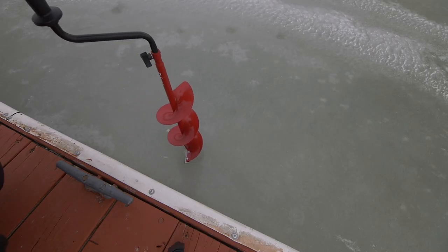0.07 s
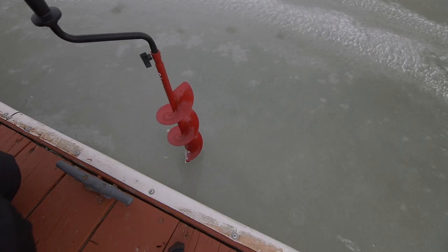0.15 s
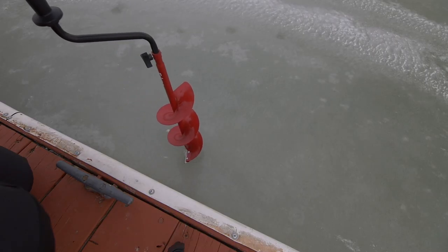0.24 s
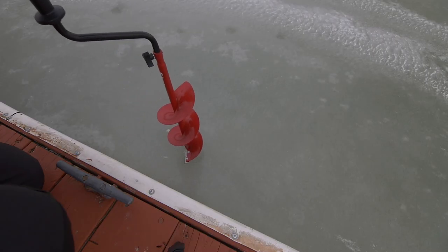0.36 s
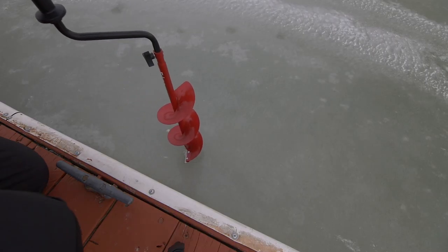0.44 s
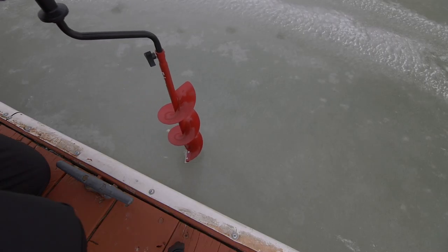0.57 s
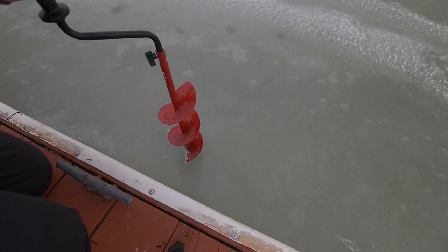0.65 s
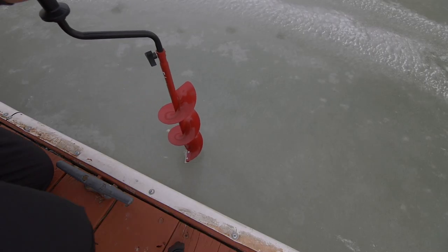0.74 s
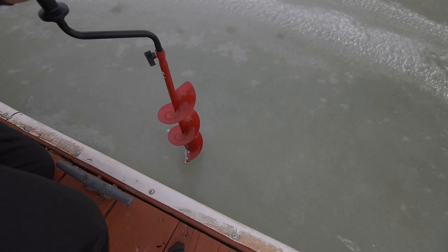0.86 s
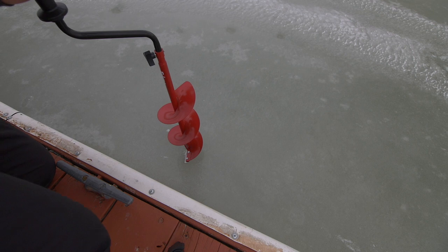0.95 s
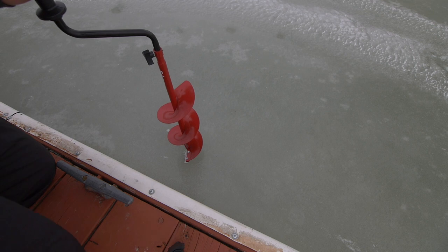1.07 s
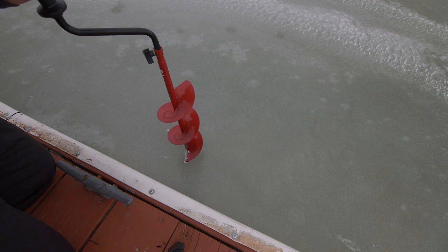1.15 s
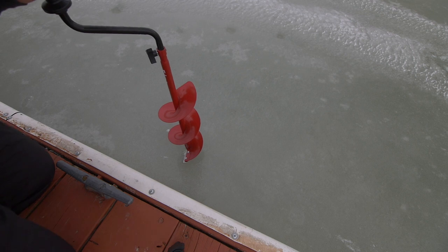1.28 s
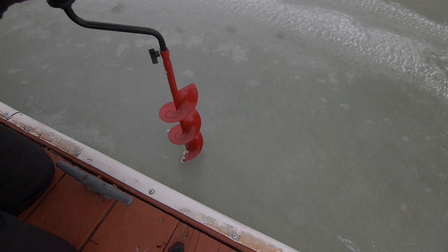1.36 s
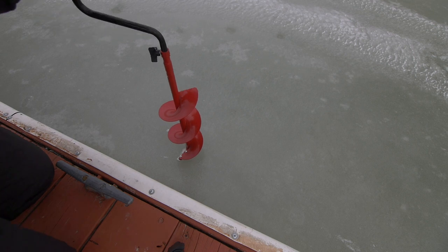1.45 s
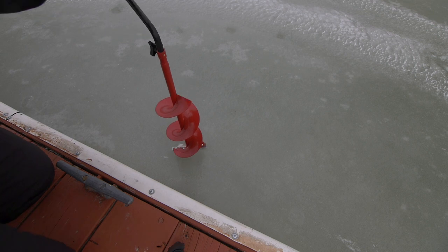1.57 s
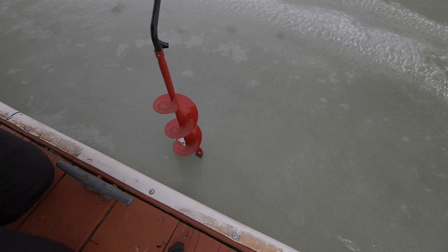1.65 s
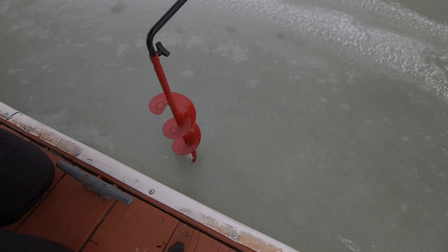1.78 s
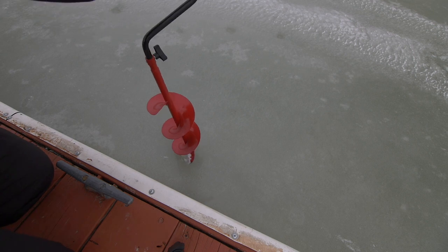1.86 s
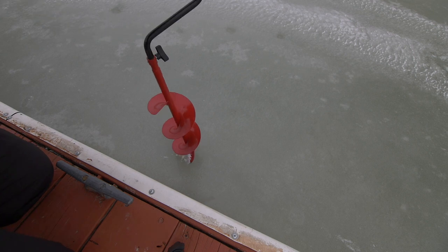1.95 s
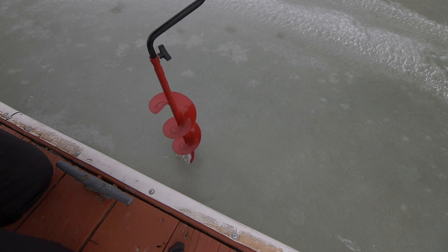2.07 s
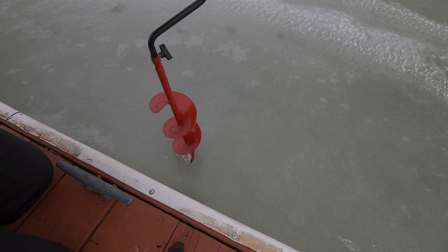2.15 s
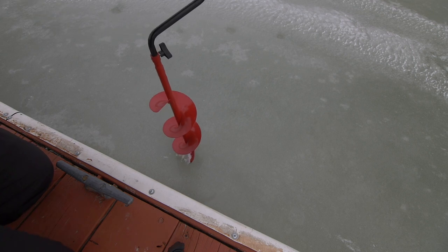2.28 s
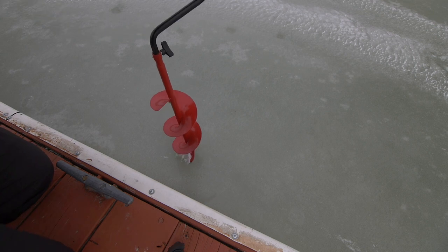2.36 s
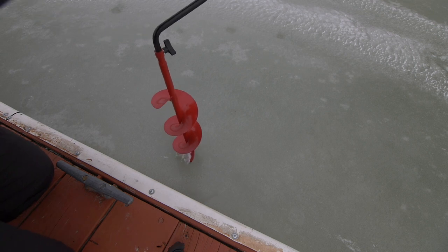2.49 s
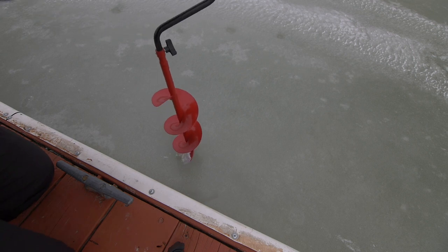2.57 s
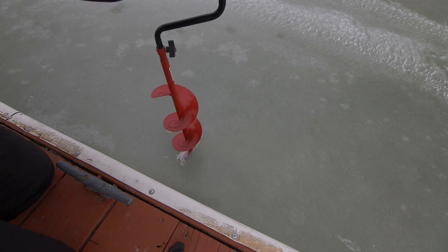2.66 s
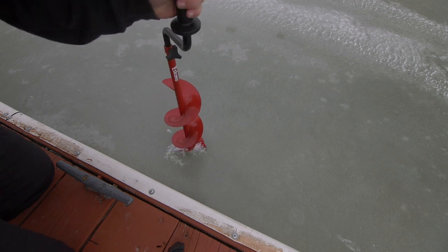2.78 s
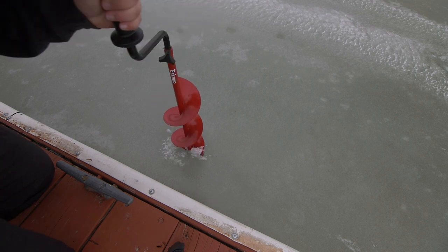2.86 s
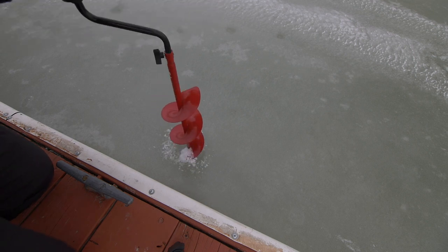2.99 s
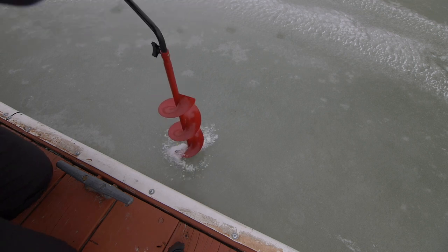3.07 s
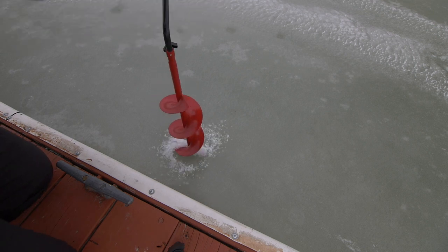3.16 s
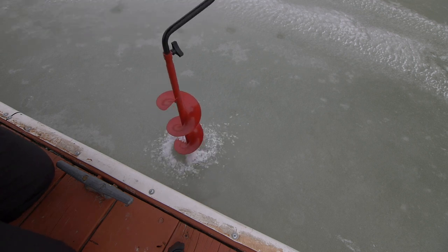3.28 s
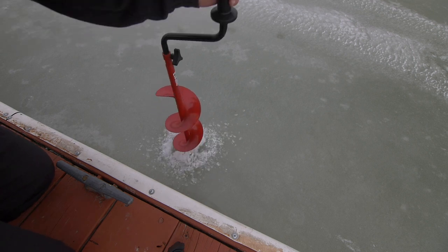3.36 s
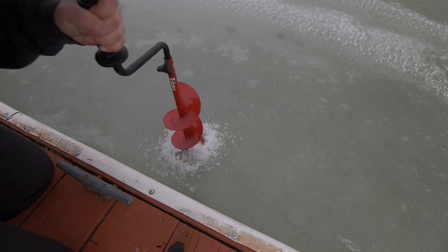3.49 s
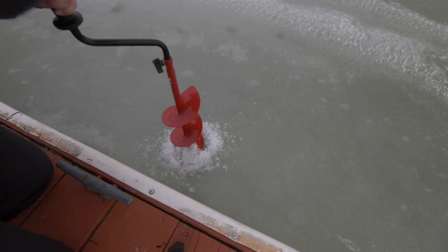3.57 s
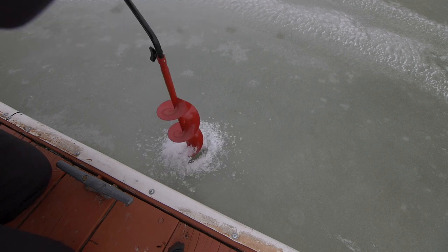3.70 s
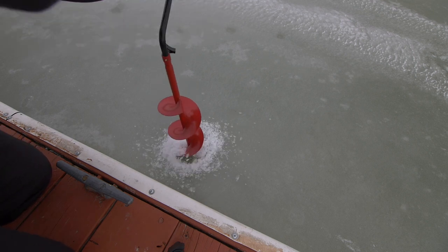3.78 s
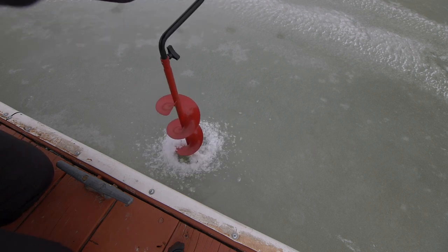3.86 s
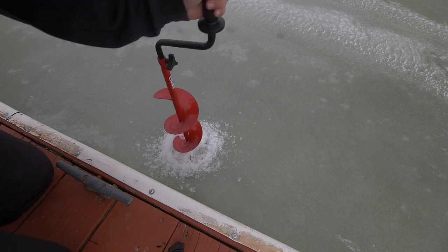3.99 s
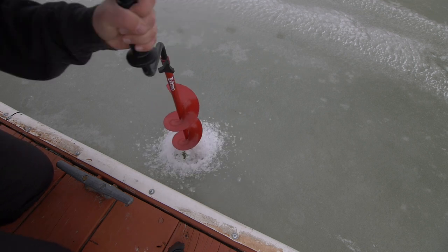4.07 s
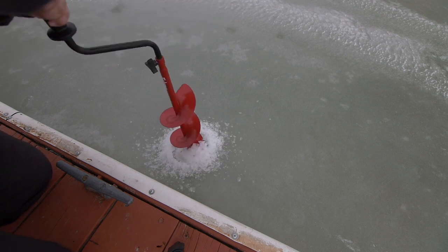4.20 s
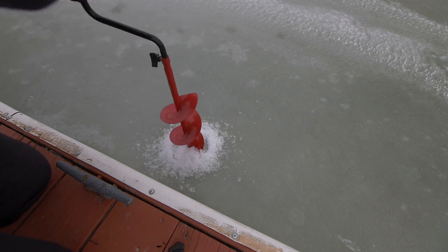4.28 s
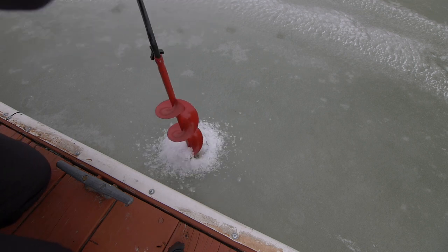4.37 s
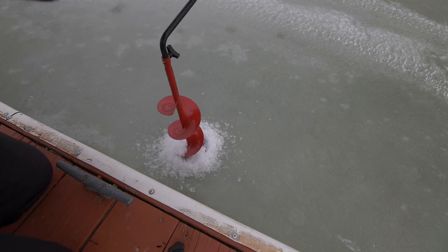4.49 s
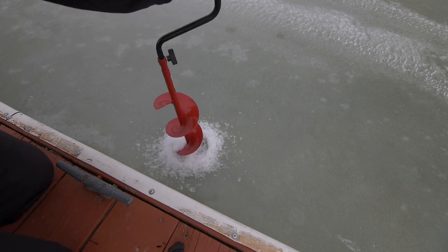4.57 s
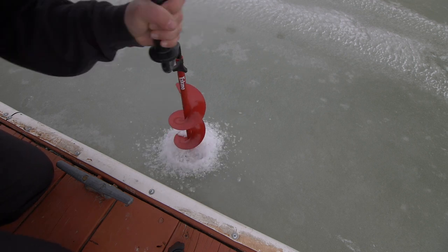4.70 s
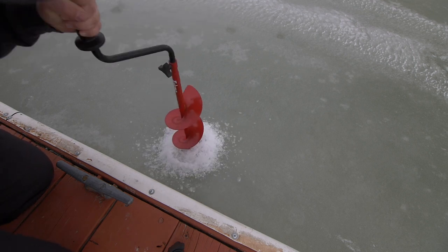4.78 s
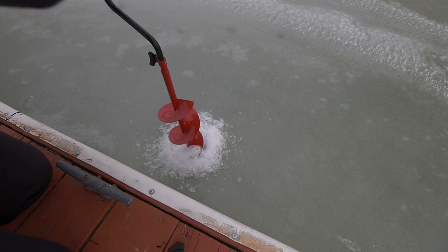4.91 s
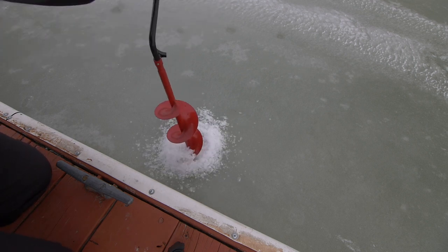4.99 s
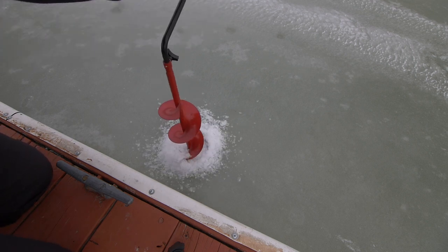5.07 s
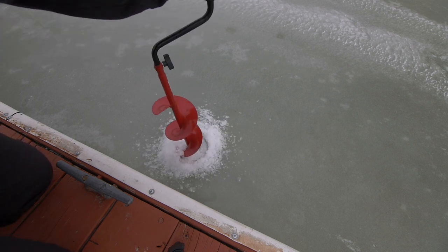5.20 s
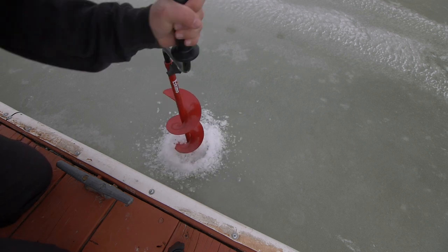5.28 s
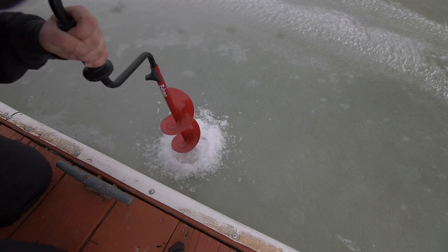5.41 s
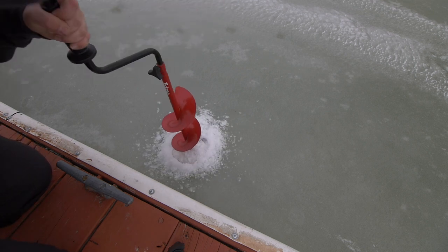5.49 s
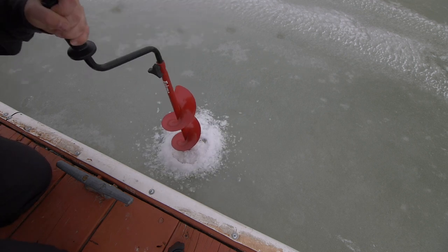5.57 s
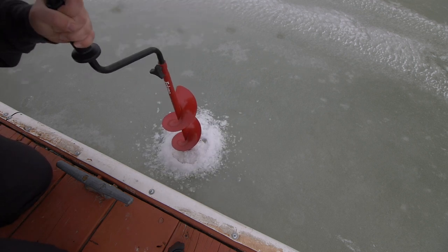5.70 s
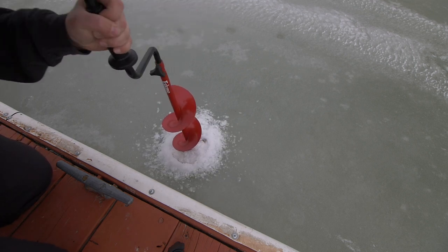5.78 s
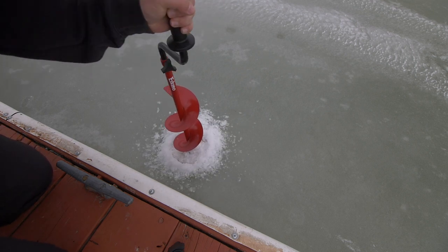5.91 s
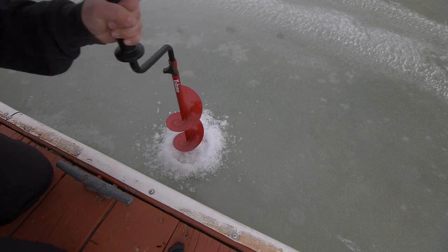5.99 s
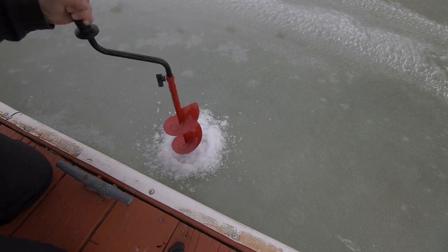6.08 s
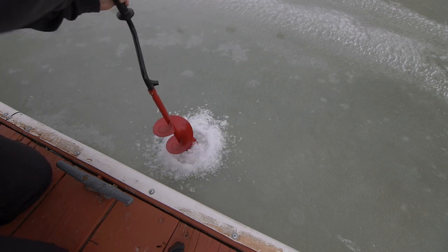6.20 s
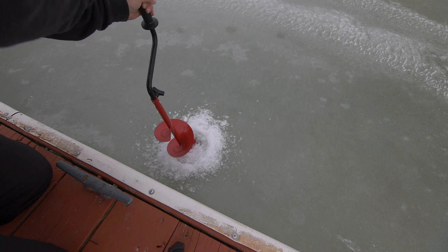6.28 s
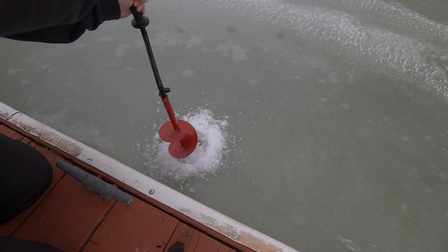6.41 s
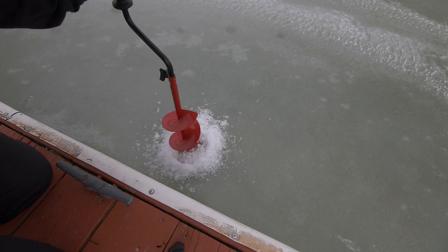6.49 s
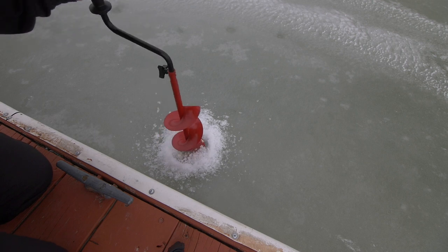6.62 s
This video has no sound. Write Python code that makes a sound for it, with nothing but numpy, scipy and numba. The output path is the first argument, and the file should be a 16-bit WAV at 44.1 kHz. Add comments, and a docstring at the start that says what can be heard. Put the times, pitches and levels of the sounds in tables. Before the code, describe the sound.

Close outdoor sound of steel blades shaving thin ice: faint ticks, a trial scrape, a steady turning crunch, then loud irregular knocks.

```python
"""On a frozen lake beside a wooden dock, a hand-cranked steel auger shaves into thin ice close to a small camera.
Dense tiny fractures and single knocks shake the ice sheet, which rings the steel blades and shaft.
Loose chips ring briefly, struck chunks of ice give short tones, and the hole adds a hollow thud.
The dock boards rumble and thump under the shifting driller, over a faint outdoor hush of filtered noise."""
import sys
import numpy as np
from scipy import signal
from scipy.fft import rfft, irfft
from scipy.io import wavfile
from scipy.ndimage import uniform_filter1d
from numba import njit

SR = 44100
rng = np.random.default_rng(int(sys.argv[2]) if len(sys.argv) > 2 else 0)


def bounce(signal):
    """Save signal as a 16-bit WAV file at the path given by the first command-line argument."""
    frames = np.transpose(np.atleast_2d(signal))
    limited = np.clip(frames, -1, 1)
    pcm = np.round(limited * 32767).astype(np.int16)
    wavfile.write(sys.argv[1], SR, pcm)


N = 293265
T = np.arange(N) / SR  # time of each sample, s
SLOW = T[::64].copy()  # time of each 64th sample, for slow controls, s
STEADY = np.ones(len(SLOW))  # a control that never changes

# Rasp, weight, crunch, hiss and tail levels describe the force on the ice, before colouring and trimming.
# Knocks and cracks. Each row: start in seconds, rasp peak in dB, then weight, crunch and hiss in dB
# relative to the rasp, crumbling tail in dB, and for the struck chunk its pitch in Hz, peak in dB
# and time to fall 60 dB in seconds.
KNOCKS = [(.2274, -44, 4, 1, -12, -75, 864, -50, .04), (.3194, -45.5, 11, 7, -8, -75, 634, -53, .05),
          (0.3864, -37, -7, -7, -10, -63, 350, -45, .045), (.4953, -48, -11, -11, 1, -70, 1210, -64, .045),
          (.969, -43, 7, -6, -11, -76, 518, -50, 0.038), (1.059, -43, 12, -3, 2, -70, 1070, -48, 0.03),
          (1.2106, -46, 0, -12, 8, -70, 1230, -51, .1), (1.9142, -32, 11.5, -5, 1, -56, 1183, -34.5, .12),
          (2.0747, -15.5, 2.5, -12, -7.5, -35, 1160, -47, 0.11),
          (2.0967, -28.5, 5, 3, -2, -53, 1190, -40, .08), (2.2145, -53, 17, 15, -10, -78, 2170, -40, 0.032),
          (2.2603, -50, -11, -5, 3, -76, 504, -48, 0.07), (2.294, -35, -5, 0, -3.5, -85, 487, -46, .05),
          (2.3448, -25.5, 1, 3, -8.5, -56, 1300, -23, .015),
          (2.5067, -43, 2, -5, -1, -58, 1170, -45, 0.063), (2.533, -38, 5, -15, -0.5, -61, 1160, -43, .045),
          (2.5466, -31, -3, -12, -6, -50, 1160, -48, .045),
          (2.5969, -27, -5, -22, -8, -52, 1140, -40, .045),
          (5.375, -11.5, 5.5, -4, -18, -26, 1110, -19, .045),
          (5.386, -20, -8, -3, -14, -18, 1304, -10, .05),
          (5.5433, -27, 2.5, -6, -16, -37.5, 935, -26, 0.04),
          (5.5583, -21, 3, -5, -11, -44.5, 970, -25.5, 0.041),
          (5.7064, -31, 8, 2.5, -2, -57, 1145, -29, 0.026),
          (5.7496, -39, 13, 6, -29, -47.5, 1190, -32, 0.056),
          (5.9764, -27, 3, -10, -20, -47, 1200, -27, .05), (6.037, -24, 7, 4, -4, -37, 192, -17.5, 0.042),
          (6.0424, -10, 7.5, 1, -12, -21, 1320, -15, 0.044),
          (6.123, -24.5, 14.5, 2, -2, -42, 664, -22, 0.03),
          (6.1509, -26.5, 11.5, -3, -2, -50, 1220, -32, .045),
          (6.1789, -31.5, 11, 5, -9, -51, 1097, -26, 0.11),
          (6.2309, -18, -2.5, -8, -7, -39, 1600, -26.5, .05),
          (6.2748, -48, 4, -3, -13, -62, 1200, -48, .036),
          (6.2921, -27, 8.5, 3, -4.5, -54, 1095, -26.5, 0.038),
          (6.32, -36, -1, -6, -20, -62, 437, -39.5, 0.16), (6.4403, -37, 0, -10, -9, -49, 1340, -43, .045),
          (6.453, -42, 0, -11, -8, -66, 1190, -38.5, .04),
          (6.5017, -22, 13.5, 6, -0.5, -27.5, 1058, -6, 0.046),
          (6.5111, -4, -1, 0, -7, -24, 1205, -8.5, .04),
          (6.5236, -19.5, 18.5, -1, -18, -41.5, 465, -16.5, 0.076),
          (6.57, -14.5, 1, -4, -9.5, -30, 1226, -28, .045), (6.6059, -33, 3, -2, -23, -54, 2190, -35, .045)]
# The blades shaving ice in a first trial turn, then the long grind.
# Each row: time in seconds, rasp level in dB, weight of the ice sheet in dB relative to the rasp.
TRIAL_TURN = [(1.2, -66, 5), (1.288, -63, 12), (1.392, -49, -1.5), (1.684, -31.5, -10), (1.786, -37, -0.5),
              (1.812, -31.5, -5), (1.83, -42, 6), (1.912, -47, 4.5), (1.96, -63, 4)]
GRIND = [(2.54, -53, 5), (2.58, -50.5, 2.5), (2.62, -35.5, -3.5), (2.71, -29.5, -6), (2.8, -34.5, -0.5),
         (2.91, -27.5, -4), (2.98, -29, 1.5), (3.09, -24.5, -3.5), (3.24, -29.5, -2.5), (3.34, -23, 0.5),
         (3.56, -23, -0.5), (3.68, -24, -1.5), (3.8, -27, 2.5), (3.88, -25.5, 1.5), (3.95, -23, 3),
         (4.08, -20, -1.5), (4.15, -21.5, 0.5), (4.28, -25.5, 0), (4.36, -19, -3), (4.42, -23, -2),
         (4.46, -31, 4.5), (4.58, -26, -1), (4.64, -19.5, -5.5), (4.719, -22, 3), (4.83, -29.5, -1),
         (5.0, -24.5, 0), (5.04, -41, 6.5), (5.19, -30, 4), (5.245, -19, -10), (5.31, -26, 3.5),
         (5.37, -32.5, 2), (5.45, -32.5, 1), (5.499, -35.5, 5), (5.53, -67, -9)]
# Scuffs of the resting blades. Each row: loudest moment in seconds, rasp level in dB,
# weight in dB relative to the rasp, seconds to rise by 10 dB, seconds to fall by 10 dB.
SCUFFS = [(.02, -63, 4, 0.093, 0.19), (.36, -67, 10, 0.046, .04), (.2, -72, 3, .1, .15),
          (.394, -57, 5.5, 0.05, 0.022), (.476, -59, -2.5, .06, .12), (.78, -50, -0.5, 0.15, 0.067),
          (1.0, -56, 5, 0.079, 0.17), (1.15, -69, 6, .15, .15), (2.33, -61, 0, .03, 0.052),
          (2.2, -69, -6, .08, 0.055), (2.47, -59.5, 6, 0.019, 0.01), (5.67, -66, -13, .03, 0.024),
          (5.785, -46, 10.5, 0.02, 0.087), (5.88, -52, -9, 0.092, 0.036), (6.006, -35.5, 6, 0.019, 0.084),
          (6.34, -59.5, 14.5, 0.035, 0.011), (6.5, -42.5, 15, 0.0073, .01), (6.47, -61.5, 8, .03, 0.039)]
# Upper registers while shaving. Each row: time in seconds, crunch and chip hiss in dB relative to
# the rasp, before a heavier bite lifts them.
GRAIN = [(0, -5, -2), (.35, 0, -1.5), (.75, -9, -3.5), (1.2, -4, -2), (1.7, -7, -3), (1.9, -10, -5),
         (2.15, 7, -3), (2.38, 7, 2), (2.45, -8, -3), (2.62, -6, -7), (2.98, -1, -7.5), (3.25, -8.5, -8),
         (3.58, -3, -11), (3.85, -7, -10), (4.2, -1, -9.5), (4.45, -6, -10), (4.86, -2, -10),
         (5.05, -4, -11), (5.4, -3, -11.5), (5.8, -4, -9.5), (6.65, -7, -8)]
# How the blades sit. Each row: time in seconds, depth from 0 (on top) to 1 (sunk in), steel ring in dB,
# damping by slush as a factor on the width of each steel mode, gain of the hole's hollow thud in dB.
SEAT = [(0, 0.74, -16, 1.9, -5), (1.2, 0.3, 5, 1.15, -41), (1.9, 0.15, 3.5, 1.42, 8),
        (2.5, 0.53, 6, 2.1, -3), (3.2, 0.64, 6.5, 1.4, -30), (4.3, 0.68, 4.5, 1.66, -4),
        (5.4, 1, -3, 2.27, 4), (5.7, 0.5, 1.5, 2.8, -5), (6.65, 0.52, -3, 4.7, -2)]
# Ice colour with the blades on top, then sunk in. Each row: frequency in Hz, relative level in dB per Hz.
SURFACE_COLOUR = [(120, -28.5), (200, -3.5), (806, -4), (1160, 7), (1270, -3.5), (1400, 1.5), (2020, -16),
                  (3430, -9.5), (4350, -24), (6280, -28), (13300, -33), (16000, -43.5)]
SUNK_COLOUR = [(120, -48), (200, -22), (558, -5), (623, -0.5), (836, -7.5), (968, -6.5), (1370, 1.5),
               (1480, -5), (2560, -13.5), (3430, -6.5), (4770, -20), (6400, -17.5), (13600, -28.5),
               (16000, -30.5)]
# Pitches of the modes of blades and shaft, in Hz.
STEEL_HZ = [453, 632, 984, 1057, 1135, 1200, 1378, 1541, 1715, 2030, 2120, 2360, 2690, 3038, 3320, 3460,
            3500, 3655, 3840, 4450, 4966, 5160, 5490, 5730, 5980, 6220, 6460, 6715, 7600, 9300]
# The same modes. Each row: gain over the ice in dB when resting on top, gain in dB when sunk in
# (the steel ring of SEAT adds to both), seconds to fall 60 dB before slush damping.
STEEL = [(-4, -7.5, 0.21), (-30, 2.5, 0.084), (-3, 3.5, 0.36), (-8.5, 7, 0.44), (-21, 9, 0.24),
         (12, 0.5, 0.25), (0, 3.5, 0.24), (-4.5, 4.5, 0.18), (-17, -19, 0.24), (-0.5, 2, 0.35),
         (7.5, -3.5, 0.039), (0, 1.5, 0.039), (-18, 4, 0.27), (4.5, -1, 0.26), (4.5, -6, 0.069),
         (-15.5, 7, 0.13), (5, -7.5, 0.019), (3.5, -0.5, 0.11), (-13, 0, 0.16), (-15, -1, 0.23),
         (1, 6, 0.096), (-21, 7.5, 0.016), (-2, 5, 0.067), (-6, -1, 0.026), (5, -0.5, 0.11),
         (1.5, 9.5, 0.11), (8.5, 5.5, 0.16), (2.5, -14, 0.13), (-5, -14, 0.23), (-18, 5, 0.11)]
# Borders between the four registers weight, crunch, rasp and hiss, in Hz.
SPLIT_HZ = (1700, 2800, 4500)
# Seconds for the crumbling tail to fall 60 dB in each register; it lasts longest in the low ones.
TAIL_T60_S = (0.11, 0.1, 0.075, 0.085)
# Dock boards under load. Each row: time in seconds, deep rumble in dB, upper rumble in dB.
DOCK = [(0, -41, -53), (.17, -64, -54), (.38, -59, -54), (.43, -46.5, -57), (.59, -47.5, -56.5),
        (.65, -54, -55), (1.1, -59, -52.5), (1.35, -47, -54.5), (1.7, -51, -53), (1.88, -54, -43.5),
        (1.98, -61, -54.5), (2.2, -52, -52), (2.32, -44.5, -54), (2.47, -55, -51.5), (2.56, -63, -55),
        (3.1, -66, -46), (3.35, -63, -46), (3.5, -62, -44.5), (3.8, -62, -40), (3.9, -59, -45),
        (5.0, -60, -46), (5.4, -56.5, -43), (5.58, -56, -45), (5.66, -63, -61), (5.87, -58, -55),
        (6.2, -62, -78), (6.36, -49, -65), (6.47, -64, -58), (6.65, -57, -55)]
# Modes of the boards. Each row: pitch in Hz, width in Hz, relative level in dB.
BOARDS = [(35, 10, -9.5), (63.6, 33, -4), (107, 43, 1), (166.4, 49.5, 2), (236, 250, -5), (332, 89, -6.5)]
# A knee on the boards. Each row: start in seconds, level in dB, pitch it settles to in Hz.
THUMPS = [(.4, -45, 46), (1.132, -30, 59), (1.225, -30, 58.8)]
# Colour of the outdoor hush. Each row: frequency in Hz, relative level in dB per Hz.
HUSH = [(120, -8), (200, -7.5), (647, -4.5), (836, -8), (1000, -19), (1840, -12.5), (2700, -13),
        (4520, -18.5), (16000, -37)]


def auger(trim_db=-4.5):
    """The force on the ice sounds through the sheet, the steel, the loose chips and the hole."""
    force, chunks = forces()
    depth, ring_db, damping, thud_db = curve(SEAT, SLOW)
    depth = np.clip(depth, 0, 1)
    ice = ice_sheet(force, np.interp(T, SLOW, depth))
    body = ice + steel(ice, depth, ring_db, damping) + chips(ice)
    return undb(trim_db) * body + chunks + hole(force[0], thud_db)


def forces(patchy_db=0.45):
    """Force on the ice in four registers from shaving and knocks; and the tones the knocks strike."""
    patches_db = patchy_db * np.array([walk(24.88) for _ in range(4)])
    breaks = fractures()
    force = breaks * shaving() * undb(patches_db)
    tones = np.zeros(N)
    for s, peak_db, weight, crunch, hiss, tail_db, hz, tone_db, tone_t60 in KNOCKS + ticks():
        i = int(s * SR)
        t = T[:min(SR // 6, N - i)]
        now = slice(i, i + len(t))
        registers = undb(np.array([[weight], [crunch], [0], [hiss]]))
        force[:, now] += knock(t, breaks[now], peak_db, tail_db) * registers
        chunk = fade(t, tone_t60, rise=.001) * np.sin(2 * np.pi * hz * t)
        tones[now] += undb(tone_db) * chunk
        # the sheet flexes under each knock
        flex = fade(t, .05) * np.sin(2 * np.pi * 311 * t)
        tones[now] += undb(peak_db + weight - 22) * flex
    return force, tones


def fractures(dense=.3, scatter_db=1.26, flutter_db=1.0):
    """Tiny breaks at random moments (dense: chance per sample), uneven and in small flurries; rms 1."""
    when = rng.random(N) < dense
    size = rng.exponential(size=N)
    sign = rng.standard_normal(N)
    return unit(when * sign * undb(scatter_db * size + flutter_db * walk(60)))


def shaving(crunch_per_weight=0.37, hiss_per_weight=0.27, roundness=1.28):
    """Gains of weight, crunch, rasp and hiss as the blades turn or scuff; powers of all strokes add."""
    crunch_db, hiss_db = curve(GRAIN)

    def registers(rasp, weight):
        """A heavier bite also lifts crunch and hiss, by so many dB per dB."""
        crunch = crunch_db + crunch_per_weight * weight
        hiss = hiss_db + hiss_per_weight * weight
        return undb(rasp + np.array([weight, crunch, 0 * T, hiss]))

    power = np.zeros((4, N))
    for rows in (TRIAL_TURN, GRIND):
        turning = (T >= rows[0][0]) & (T < rows[-1][0])
        power += registers(*curve(rows)) ** 2 * turning
    for s, rasp_db, weight_db, rise, fall in SCUFFS:
        away = np.where(T < s, (s - T) / max(rise, .005), (T - s) / max(fall, .005))
        power += registers(rasp_db - 10 * away ** roundness, weight_db + 0 * T) ** 2
    return np.sqrt(power)


def knock(t, breaks, peak_db, tail_db):
    """A short burst of noise as the ice cracks, then tiny breaks that crumble away in each register."""
    crack = rng.standard_normal(len(t)) * fade(t, .022, rise=0.00046)
    crack[:2] += 2.2  # the first contact is a tick
    tails = np.array([fade(t, t60, rise=0.0011) for t60 in TAIL_T60_S])
    return crack * undb(peak_db - 11) + breaks * undb(tail_db) * tails  # noise peaks lie above its rms


def ticks(count=12, start_s=.19, end_s=.36, middle_db=-48, scatter_db=5.5, middle_hz=1090):
    """Faint ticks as the blades settle: a slow creak, nearly evenly spaced, in rows like KNOCKS."""
    rows = []
    for k in range(count):
        late, loud, high = rng.random(3)
        s = start_s + (end_s - start_s) * (k + .4 * late) / count
        peak_db = middle_db + scatter_db * (2 * loud - 1)
        hz = middle_hz * 2 ** (high - .5)  # within half an octave either way
        rows.append((s, peak_db, 6, 1, -9, -90, hz, peak_db - 3, .02))
    return rows


def ice_sheet(force, sunk):
    """The sheet colours each register of the force, blending two colours as the blades sink in."""
    lo, mid, hi = SPLIT_HZ
    bands = [(lo, "low"), ((lo, mid), "band"), ((mid, hi), "band"), (hi, "high")]
    ice = np.zeros(N)
    for colour, share in ((response(SURFACE_COLOUR), 1 - sunk), (response(SUNK_COLOUR), sunk)):
        for band, push in zip(bands, force):
            h = signal.sosfilt(signal.butter(4, *band, fs=SR, output="sos"), colour)
            h = h / np.sqrt(np.sum(h ** 2))  # equal energy in every register
            ice += signal.oaconvolve(share * push, h)[:N]
    return ice


def steel(ice, depth, ring_db, damping, wander_db=4.5, drift=0.0037):
    """Modes of blades and shaft ring on the ice sound, lit unevenly and bent as the blades turn."""
    out = np.zeros(N)
    for hz, (top_db, sunk_db, t60) in zip(STEEL_HZ, STEEL):
        lit_db = ring_db + top_db + depth * (sunk_db - top_db) + wander_db * walk(7, SLOW)
        bent_hz = hz * (1 + drift * walk(5.5, SLOW))
        width_hz = damping * np.log(1000) / np.pi / t60  # a wider mode dies sooner
        out += ring(ice, undb(lit_db), bent_hz, width_hz)
    return out


def chips(ice, count=8, lowest_hz=603, highest_hz=13880, life_s=.06, sharpness=61, level_db=5):
    """Loose chips ring for a moment at their own pitch, then others take their place."""
    out, hold = np.zeros(N), int(life_s * SR / 64)
    for k in range(count):
        pitches = lowest_hz * (highest_hz / lowest_hz) ** rng.random(400)
        # each voice changes chips at its own moment
        hz = np.repeat(pitches, hold)[k * hold // count:][:len(SLOW)]
        out += ring(ice, STEADY, hz, hz / sharpness)
    return undb(level_db) * out


def hole(weight_force, thud_db, hz=436, width_hz=290):
    """The hole answers the lowest register with one broad, hollow resonance."""
    return ring(weight_force, undb(thud_db), hz * STEADY, width_hz * STEADY)


def dock():
    """Boards are resonances driven by noise: two carry the deep rumble, the rest the upper; thumps join."""
    deep, upper = load()
    modes = []
    for hz, width_hz, db in BOARDS:
        board = rng.standard_normal(N)
        for _ in range(2):  # twice through the resonance for steeper sides
            board = ring(board, STEADY, hz * STEADY, width_hz * STEADY)
        modes.append(undb(db) * unit(board))
    return deep * unit(sum(modes[:2])) + upper * unit(sum(modes[2:])) + thumps()


def load(knock_db=(-45, -31.5), thump_db=(0.5, -7)):
    """Gains of deep and upper rumble: the shifting driller, plus a jolt from each knock and thump."""
    power = undb(curve(DOCK)) ** 2
    # a knock jolts the boards relative to its weight, a thump relative to its own level
    jolts = [(s, peak_db + weight + np.array(knock_db)) for s, peak_db, weight, *_ in KNOCKS]
    jolts += [(s, level_db + np.array(thump_db)) for s, level_db, _ in THUMPS]
    t = T[:SR // 4]
    for s, db in jolts:
        i = int(s * SR)
        jolt = undb(db)[:, None] * fade(t, 0.3, rise=0.0038)[:N - i]
        power[:, i:i + len(t)] += jolt ** 2
    return np.sqrt(power)


def thumps():
    """A knee sets off a short swell that falls in pitch, with a higher partial and a brief contact tone."""
    out, t = np.zeros(N), T[:SR // 5]
    for s, level_db, hz in THUMPS:
        phase = 2 * np.pi * hz * (t + 0.0114 * (1 - np.exp(-t / 0.014)))
        swell = t / 0.035 * np.exp(1 - t / 0.03) * np.exp(-(t / 0.081) ** 4)
        contact = np.exp(-t / 0.0097) * np.sin(2 * np.pi * 130 * t)
        i = int(s * SR)
        out[i:i + len(t)] += undb(level_db) * swell * (np.sin(phase) + 0.35 * np.sin(3.1 * phase))
        out[i:i + len(t)] += undb(level_db - 10) * contact
    return out


def hush(level_db=-62, wander_db=0.43):
    """Faint open-air noise: random noise with a fixed colour and a slightly wandering level."""
    air = signal.fftconvolve(rng.standard_normal(N), response(HUSH))[:N]
    return undb(level_db + wander_db * walk(5.2)) * unit(air)


@njit
def ring(x, gain, hz, width_hz):
    """State-variable band-pass, gain 1 at the centre; its controls are renewed every 64 samples."""
    y, band, low = np.empty(len(x)), 0., 0.
    g, k, a = 0., 0., 0.  # tuning, relative width, input gain
    for i in range(len(x)):
        if i % 64 == 0:
            j = i // 64
            g, k, a = np.tan(np.pi * hz[j] / SR), width_hz[j] / hz[j], gain[j]
        v = (band + g * (a * x[i] - low)) / (1 + g * (g + k))
        band = 2 * v - band
        low = low + 2 * g * v
        y[i] = k * v
    return y


def fade(t, t60, rise=1e-4):
    """Quick rise (time constant in seconds), then a fall of 60 dB in t60 seconds."""
    return (1 - np.exp(-t / rise)) * np.exp(-np.log(1000) * t / max(t60, .005))


def walk(rate, at=T):
    """Random levels, rate of them a second, joined smoothly; spread near 1."""
    coarse = np.arange(0, N / SR + 1 / rate, .25 / rate)
    levels = np.repeat(rng.standard_normal(len(coarse)), 4)
    for _ in range(2):
        levels = uniform_filter1d(levels, size=4)
    return np.interp(at, coarse, unit(levels[:len(coarse)]))


def response(table, size=1024):
    """Impulse response with the colour of a spectrum table, its energy as early as possible."""
    f, db = np.transpose(table)
    hz = np.fft.rfftfreq(size, 1 / SR)
    level_db = np.interp(np.log(hz + 1e-9), np.log(f), db)
    cepstrum = irfft(np.log(undb(level_db)))
    # folding the later half onto the earlier makes the response start at once
    cepstrum[1:size // 2] *= 2
    cepstrum[size // 2 + 1:] = 0
    return irfft(np.exp(rfft(cepstrum)))


def curve(rows, at=T):
    """Columns of a table as signals in time, with straight lines between the rows."""
    s, *columns = np.transpose(rows)
    return [np.interp(at, s, c) for c in columns]


def undb(db):
    """Gain of a level in dB."""
    return np.exp(np.asarray(db) * np.log(10) / 20)


def unit(x):
    """Scale to rms 1."""
    return x / np.sqrt(np.mean(x ** 2))


def scene():
    """Auger, dock and air at one microphone."""
    return (auger() + dock() + hush())[None]


def record(dry, ceiling=.62, top_hz=15850):
    """The camera rounds the loudest peaks below a ceiling and steeply cuts the treble above top_hz."""
    rounded = dry / (1 + np.abs(dry / ceiling) ** 4) ** (1 / 4)
    return signal.sosfilt(signal.ellip(12, .2, 95, top_hz, fs=SR, output="sos"), rounded)


dry = scene()
out = record(dry)
bounce(out)
```